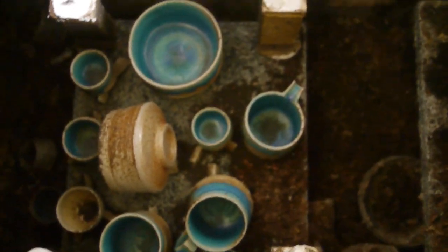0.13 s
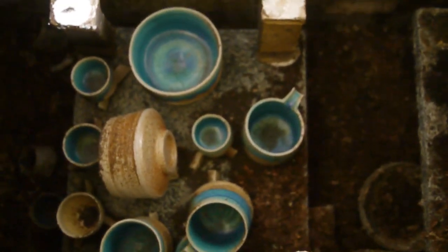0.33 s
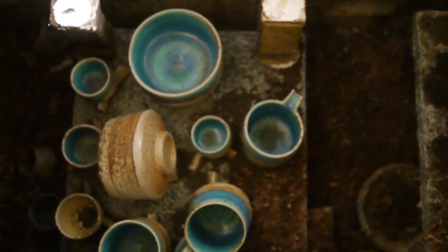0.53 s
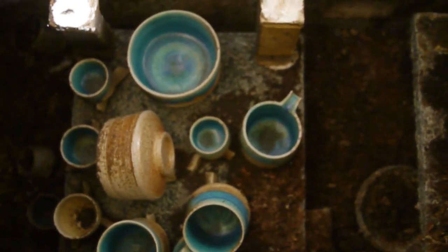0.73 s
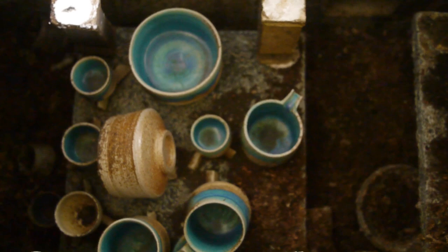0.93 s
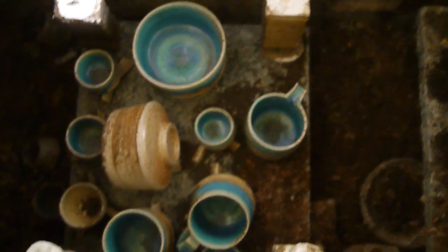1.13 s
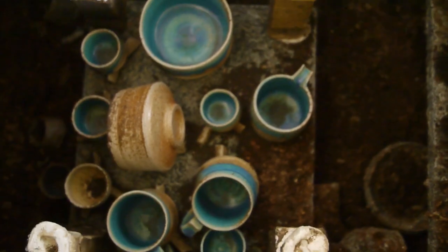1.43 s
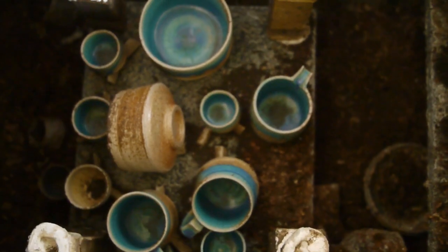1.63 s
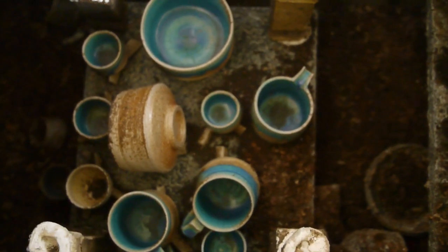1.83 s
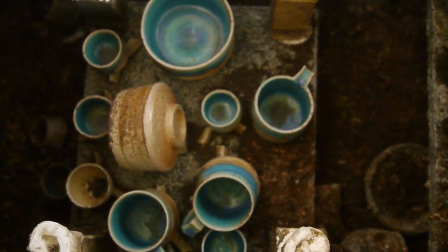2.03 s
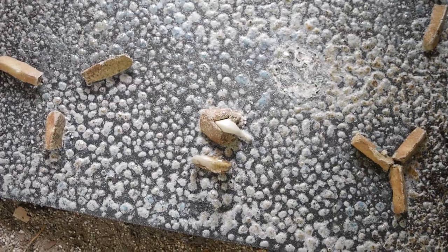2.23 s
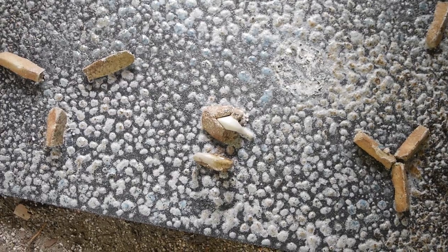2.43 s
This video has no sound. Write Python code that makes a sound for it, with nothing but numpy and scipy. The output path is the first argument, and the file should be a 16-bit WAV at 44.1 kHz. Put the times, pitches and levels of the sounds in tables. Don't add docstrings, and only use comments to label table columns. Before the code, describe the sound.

Glazed ceramic pots clink, knock and scrape on a gritty kiln shelf, then near silence

```python
import sys
import numpy as np
from scipy import signal
from scipy.fft import rfft, irfft
from scipy.io import wavfile
from scipy.ndimage import uniform_filter1d

SR = 44100
rng = np.random.default_rng(int(sys.argv[2]) if len(sys.argv) > 2 else 0)


def natural_amplitude(level_db):
    exponent = np.asarray(level_db, float) / 20
    return 10 ** exponent


def output_pcm(signal):
    pcm = np.clip(np.atleast_2d(signal).T, -1, 1) * 32767
    wavfile.write(sys.argv[1], SR, np.round(pcm).astype(np.int16))


N = 114660
STILL = [(0, -150), (1, -150)]

# (frequency [Hz], density [dB per Hz])
CUP_GRIT = [(120, -40), (200, -16), (575, -7), (3010, -1), (15500, -31.5)]
# (frequency [Hz], level [dB], t60 [s])
SHELF = [(82, 0, .12), (115, -1, .1), (170, -1, .07), (205, -1, .07), (240, -3, .07), (296, -11, .07)]
# (time [s], level [dB], pitch [Hz], t60 [s])
CLINKS = [(0, -47.5, 3855, 0.71), (0, -50, 243, 0.1), (.263, -29, 3080, 0.039), (.41, -41.5, 297, 0.49),
          (.425, -45, 242, 0.31), (1.9, -54.5, 4630, .25), (2.022, -54, 4010, 0.11),
          (1.887, -44, 3930, .03), (.2, -39, 4075, .12), (1.362, -47, 5520, 0.084),
          (.427, -33, 5300, 0.045), (.72, -26.5, 6920, 0.018), (.725, -37, 4430, 0.1),
          (1.084, -31, 1129, 0.082), (1.149, -26.5, 7050, 0.083), (1.216, -48, 2190, 0.17),
          (1.342, -28, 2860, 0.033), (2.32, -70, 9700, 0.13), (2.45, -52.5, 12250, 0.12)]


def bowl():
    # (time [s], level [dB], chatter t60 [s])
    bowl_blows = [(.6748, -38, 0.069), (.7022, -25, 0.028), (.7182, -20.5, 0.025), (.7566, -39, .04),
                  (.7675, -25, 0.076), (.797, -27, 0.047), (.8863, -41.5, 0.028), (.9322, -36.5, 0.056),
                  (.9556, -39, 0.073), (1.0085, -37, 0.029), (1.0279, -30, 0.055), (1.0374, -34, .04),
                  (1.0629, -38.5, .04), (1.0823, -34, .04), (1.1103, -41, 0.036), (1.1497, -22.5, 0.022),
                  (1.161, -39, 0.051), (1.215, -35.5, 0.14), (1.886, -20, 0.069), (1.896, -28, 0.055)]
    # (time [s], pressure [dB])
    bowl_drag = [(0.638, -52.5), (0.665, -46.5), (0.674, -37), (0.699, -37), (0.726, -27), (0.743, -35.5),
                 (0.766, -33), (0.828, -41), (.89, -44), (0.924, -49.5), (1.0, -38.5), (1.04, -39),
                 (1.058, -34.5), (1.084, -34.5), (1.128, -31.5), (1.155, -26.5), (1.188, -43),
                 (1.281, -55.5)]
    # (frequency [Hz], level [dB], t60 [s])
    bowl_modes = [(708, -3, .05), (893, -3, .13), (1125, 2, .09), (1340, -9, .2), (1600, -9, .08),
                  (1813, -9, .1), (1900, -3, .1), (1982, 1, .11), (2180, -3, .07), (2360, -8, .07),
                  (2680, -8, .06), (2910, -8, .06), (4636, -22, .25), (6176, -16, .04)]
    # (frequency [Hz], width [Hz], level [dB])
    rim_bands = [(3235, 120, -3.5), (3430, 39, -9), (4160, 53, -5.5), (5030, 90, -5), (5790, 120, -2),
                 (6220, 110, -5), (6870, 100, -0.5), (7050, 57, -3.5), (7440, 110, -5.5), (8280, 63, -8.5),
                 (8510, 130, -4.5), (8940, 70, -5), (10550, 120, -18), (11460, 120, -21)]
    # (frequency [Hz], density [dB per Hz])
    bowl_grit = [(100, -30), (220, -6.5), (800, -16.5), (2000, -7), (4000, -11.5), (8500, -18.5),
                 (11000, -23), (15500, -27)]

    rim_modes = [(hz, db, 2.9 / width) for hz, width, db in rim_bands]
    body = pot(bowl_blows, bowl_drag, bowl_modes, bowl_grit, strike_db=15.3, chatter_db=-9.5,
               ring_db=2.2, drag_ring_db=-2.1, shelf_db=-20.5, crunch_db=-2.5)
    rim = pot(bowl_blows, bowl_drag, rim_modes, bowl_grit, strike_db=5, chatter_db=-15,
              ring_db=-10, drag_ring_db=-6, shelf_db=-63, crunch_db=-33)
    return ports(body, -0.44, 68) + ports(rim, -0.71, 46)


def jar():
    # (time [s], level [dB], chatter t60 [s])
    jar_blows = [
        (.357, -10, 0.2),
    ]
    # (frequency [Hz], level [dB], t60 [s])
    jar_modes = [(571, -15, .5), (662, -11, .12), (1260, -8, .25), (2299, 5.5, .27), (2473, -5, .12),
                 (2859, -8, .1), (3022, -10, .65), (3361, -1, .11), (3499, -1, .27), (3600, 3, .13),
                 (3713, 3, .13), (3782, 1, .11), (4770, -16, .1), (5932, -15, .12)]
    # (frequency [Hz], density [dB per Hz])
    jar_grit = [(120, -39.5), (200, -25), (3610, -16.5), (12500, -42), (15500, -67)]
    x = pot(jar_blows, STILL, jar_modes, jar_grit, strike_db=11.4, chatter_db=-9,
            ring_db=7.14, drag_ring_db=-9.5, shelf_db=-19, crunch_db=-4)
    return ports(x, 0.8, 65)


def cup():
    # (time [s], level [dB], chatter t60 [s])
    cup_blows = [
        (0.001, -25, 0.039),
        (0.066, -26.5, 0.13),
    ]
    # (frequency [Hz], level [dB], t60 [s])
    cup_modes = [(721, -4, .12), (877, -4, .12), (1100, -2, .1), (1523, -11, .3), (1960, 0, .12),
                 (2546, -1, .08), (3101, -11, .1), (3391, -11, .2), (4124, -10, .12), (5642, -6, .1)]
    x = pot(cup_blows, STILL, cup_modes, CUP_GRIT, strike_db=9.1, chatter_db=-11,
            ring_db=-1.5, drag_ring_db=-2.9, shelf_db=-34, crunch_db=-1)
    return ports(x, 0.3, 68)


def mug():
    # (time [s], level [dB], chatter t60 [s])
    mug_blows = [
        (0.192, -22.5, 0.33),
        (0.248, -35.5, 0.1),
        (0.263, -30.5, 0.055),
    ]
    # (frequency [Hz], level [dB], t60 [s])
    mug_modes = [(579, -9.5, 0.18), (895, -11, 0.24), (1270, -2, 0.05), (1480, -1.5, 0.11),
                 (1818, -0.5, 0.035), (2330, -6.5, .15), (2590, -9, .12), (3054, -7, .2), (3430, -9, 0.22),
                 (4075, -3, 0.067), (4920, -12, .35), (5590, -14.5, 0.095)]
    x = pot(mug_blows, STILL, mug_modes, CUP_GRIT, strike_db=10, chatter_db=-12,
            ring_db=-1, drag_ring_db=-1.5, shelf_db=-30, crunch_db=-3.5)
    return ports(x, 0.3, 68)


def shard():
    # (time [s], level [dB], chatter t60 [s])
    shard_blows = [
        (1.3075, -25.5, 0.12),
        (1.3394, -35.5, 0.22),
        (1.7783, -32, 0.12),
        (1.7942, -35.5, 0.13),
    ]
    # (time [s], pressure [dB])
    shard_drag = [(1.6, -62), (1.625, -58), (1.68, -59), (1.7, -54.5), (1.77, -58), (1.81, -56),
                  (1.88, -47)]
    # (frequency [Hz], level [dB], t60 [s])
    shard_modes = [(718, -3.5, 0.075), (1175, -1.5, 0.048), (1880, -8, 0.15), (2126, -4, 0.072),
                   (2310, 1, 0.064), (2670, 3.5, 0.076), (2860, 4.5, 0.045), (3320, -3.5, .08),
                   (4210, -14, .06), (5120, -5, 0.12), (5650, -10, 0.068)]
    # (frequency [Hz], density [dB per Hz])
    shard_grit = [(120, -13), (200, -13.5), (2700, -2.5), (8820, -7), (15500, -25.5)]
    x = pot(shard_blows, shard_drag, shard_modes, shard_grit, strike_db=8.8, chatter_db=-13.5,
            ring_db=-1.8, drag_ring_db=-2.2, shelf_db=-40, crunch_db=-2.5)
    return ports(x, -0.81, 53)


def pot(blows, drag, modes, crunch, strike_db, chatter_db, ring_db, drag_ring_db, shelf_db, crunch_db):
    t, strikes, pressure = np.arange(N) / SR, np.zeros(N), np.zeros(N)
    for s, db, t60 in blows:
        strikes[round(s * SR)] += natural_amplitude(db + strike_db)
        fade_s = np.where(t < s, 0.004, max(t60, 0.01))
        pressure += natural_amplitude(db + chatter_db - 60 * abs(t - s) / fade_s)
    chatter = pressure * grit(5000, 1.12)

    s, db = np.transpose(drag)
    push_db = np.interp(t, s, db, -150, -150) + 2.84 * lumps(size=200) - 5
    rub = natural_amplitude(push_db) * grit(6000, 1.3)

    bell = signal.fftconvolve(strikes, natural_amplitude(ring_db) * ring(modes))[:N]
    for hz, db, t60 in modes:
        contact = (rub + chatter) * natural_amplitude(3.74 * lumps(size=600))
        partial = ring([(hz, db, t60)], damping=1.46)
        bell += signal.oaconvolve(contact, natural_amplitude(drag_ring_db + db - 8.5) * partial)[:N]

    thud = signal.fftconvolve(rub, natural_amplitude(shelf_db) * ring(SHELF))[:N]
    grains = signal.oaconvolve(0.033 * strikes + chatter + rub, colour(crunch))[:N]
    return bell + thud + natural_amplitude(crunch_db) * clumped(grains, 4.16)


def ring(modes, damping=1):
    t = np.arange(SR // 2) / SR
    x = np.zeros(len(t))
    for hz, db, t60 in modes:
        swell = 1 - np.exp(-t * hz / 4)
        fade = natural_amplitude(db - 60 * t / t60 * damping)
        x += fade * swell * np.sin(2 * np.pi * hz * t) / np.sqrt(t60)
    return x / np.linalg.norm(x)


def grit(per_s, spread_db):
    hit = rng.random(N) < per_s / SR
    size_db = spread_db * np.minimum(rng.exponential(1, N), 4)
    return evened(hit * rng.standard_normal(N) * natural_amplitude(size_db))


def colour(points):
    log_gain = read(points, abs(np.fft.fftfreq(2048, 1 / SR))) * np.log(10) / 20
    minimum_phase = np.exp(np.conj(signal.hilbert(log_gain)))
    click = np.fft.ifft(minimum_phase).real[:1024]
    return click / np.linalg.norm(click)


def clumped(x, patchy_db):
    z = signal.stft(x, nperseg=256)[2]
    patches = uniform_filter1d(rng.standard_normal(z.T.shape), size=6, axis=0)
    patches = evened(uniform_filter1d(patches, size=5, axis=1))
    return signal.istft(z * natural_amplitude(patchy_db * patches.T), nperseg=256)[1][:N]


def lumps(size):
    smooth = uniform_filter1d(rng.standard_normal(N), size=size)
    return evened(uniform_filter1d(smooth, size=size))


def evened(x):
    return x / np.sqrt(np.mean(x ** 2) + 1e-20)


def read(points, hz):
    f, value = np.transpose(points)
    return np.interp(np.log(hz + 1), np.log(f + 1), value)


def thuds():
    # (time [s], level [dB], tilt [dB per octave], t60 [s])
    booms = [
        (0, -57.5, 6, 0.54),
        (0.202, -55, 23, 0.76),
        (0.362, -44, 30, 0.074),
        (1.89, -47.5, 3.5, 0.42),
        (1.931, -51, -9, 0.25),
    ]
    out, t = np.zeros(N), np.arange(SR // 2) / SR
    for s, db, tilt_db, t60 in booms:
        modes = [(hz, level + tilt_db * np.log2(hz / 180), decay) for hz, level, decay in SHELF]
        push = (30 * (t == 0) + rng.standard_normal(len(t))) * natural_amplitude(db - 60 * t / t60)
        out[round(s * SR):][:len(t)] += signal.fftconvolve(push, ring(modes))[:len(t)]
    return out


def loose_grains():
    # (time [s], level [dB], pitch [Hz], t60 [s])
    grain_ticks = [(0, -59, 9890, 0.76), (.555, -58, 5800, 0.37), (.566, -53, 2797, 0.27),
                   (.642, -53, 3006, 0.057), (1.488, -60, 5150, 0.08), (1.63, -57.5, 5280, 0.12),
                   (1.97, -52, 6870, 0.04), (2.022, -52.5, 7980, 0.045), (2.062, -60.5, 8250, 0.071),
                   (2.177, -69, 5530, 0.0065), (2.257, -59, 4430, 0.023), (2.335, -57.5, 4500, 0.016),
                   (2.41, -61.5, 4970, .015), (2.44, -51, 12000, 0.0098), (2.444, -52.5, 4950, 0.042),
                   (2.46, -62, 4930, 0.086)]
    return ticks(grain_ticks, 2.67, size=10) + ticks(CLINKS[-2:], 0.081, size=200)


def ticks(rows, fuzz, size):
    out, t = np.zeros(N + 16000), np.arange(16000) / SR
    for s, db, hz, t60 in rows:
        flutter = 1 + fuzz * evened(uniform_filter1d(rng.standard_normal(16000), size=size))
        swell = np.minimum(t / min(0.002, t60 / 20), 1)
        fade = natural_amplitude(db - 60 * t / t60)
        out[round(s * SR):][:16000] += fade * swell * flutter * np.sin(2 * np.pi * hz * t)
    return out[:N]


def kiln(x):
    # (frequency [Hz], t60 [s])
    wall_t60 = [(200, 0.29), (2000, 0.14), (12000, 0.15)]
    taps = np.zeros((3, SR // 2))
    at = np.arange(100, SR // 2 - 20, 20)
    at = at + rng.integers(0, 20, (3, len(at)))
    np.put_along_axis(taps, at, rng.choice([-1., 1.], at.shape), 1)
    hz, t, z = signal.stft(taps, SR, nperseg=256)
    apart = np.clip(2.07 * hz / (hz + 1500), 0, 1)[:, None]
    z = np.sqrt(1 - apart ** 2) * z[2] + apart * z[:2]
    z = z * natural_amplitude(-60 * t / read(wall_t60, hz)[:, None])
    tail = signal.istft(z, SR, nperseg=256)[1]
    return signal.fftconvolve(x[None], tail / np.linalg.norm(tail[0]), axes=1)[:, :N]


def kiln_air():
    # (frequency [Hz], density [dB per Hz])
    kiln_hiss = [(18, -57.5), (30, -41.5), (161, 0.5), (2680, -1), (4530, -8), (5170, -5.5), (9000, -19),
                 (16000, -28.5)]
    return natural_amplitude(-57.5) * air(kiln_hiss)


def quiet_air():
    # (frequency [Hz], density [dB per Hz])
    quiet_hiss = [(18, -69), (30, -25), (632, -14), (2800, -19.5), (14400, -34), (16000, -53.5)]
    return natural_amplitude(-65) * air(quiet_hiss)


def air(points):
    # (frequency [Hz], left-right likeness [-1 to 1])
    likeness = [(240, 0.61), (3800, 0.069)]
    frames, hz = N // 256 + 5, np.fft.rfftfreq(1024, 1 / SR)
    a, b, c, d, patches = rng.standard_normal((frames, 513, 5)).T
    patches = evened(uniform_filter1d(uniform_filter1d(patches, 30, 0), 10, 1))
    same = np.clip(read(likeness, hz), -1, 1)[:, None]
    left = a + 1j * b
    right = same * left + np.sqrt(1 - same ** 2) * (c + 1j * d)
    z = np.array([left, right]) * natural_amplitude(read(points, hz)[:, None] + 2.3 * patches)
    return evened(signal.istft(z, nperseg=1024, noverlap=768)[1][:, :N])


def ports(x, pan_db, lag_us):
    # (frequency [Hz], left minus right [dB])
    port_lean = [(240, -2.5), (3800, 1.5)]
    hz = np.fft.rfftfreq(N, 1 / SR)
    lag = np.exp(-1j * np.pi * hz * lag_us / 1015000.0 / (1 + (hz / 9000) ** 2))
    half = natural_amplitude((read(port_lean, hz) + pan_db) / 2) * lag
    return irfft(rfft(x) * np.array([half, 1 / half]), N)


def scene():
    change_s = 2.178
    shelf = ports(thuds() + ticks(CLINKS[:-2], 0.26, size=100), 0.1, 51)
    pots = cup() + mug() + jar() + bowl() + shard() + shelf
    pots = signal.sosfilt(signal.butter(4, 68, "high", fs=SR, output="sos"), pots)
    walls = natural_amplitude(-3.5) * ports(kiln(pots.mean(0)), 0.1, 45)
    inside = pots + walls + kiln_air()

    grains = loose_grains()
    grains = ports(grains + natural_amplitude(-7) * kiln(grains), -0.3, 77)
    before = np.arange(N) < change_s * SR
    return np.where(before, inside, quiet_air()) + grains


def low_pass(x):
    return signal.sosfilt(signal.butter(12, 15900, fs=SR, output="sos"), x)


def record(dry):
    low_cut = signal.butter(2, 55, "high", fs=SR, output="sos")
    treble_edge = signal.butter(10, 15400, fs=SR, output="sos")
    mix = signal.sosfilt(treble_edge, signal.sosfilt(low_cut, dry))
    return low_pass(mix)


dry = scene()
out = record(dry)
output_pcm(out)
```